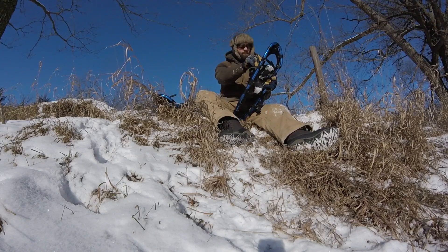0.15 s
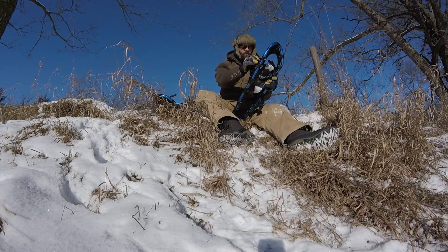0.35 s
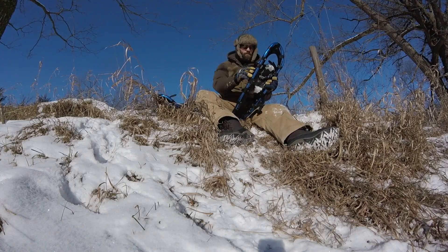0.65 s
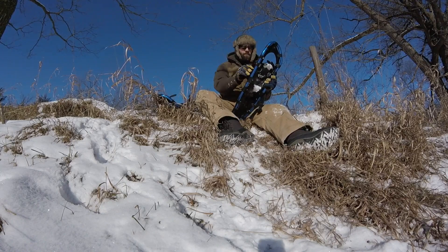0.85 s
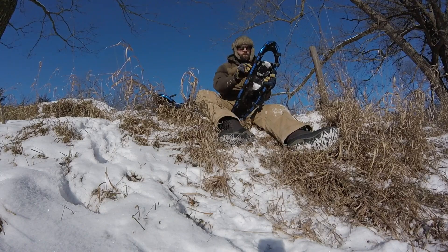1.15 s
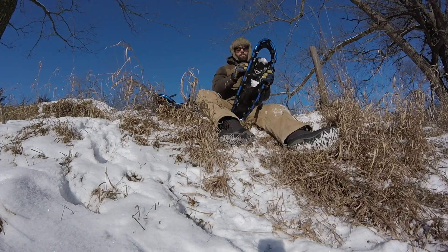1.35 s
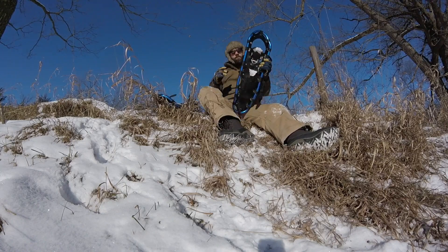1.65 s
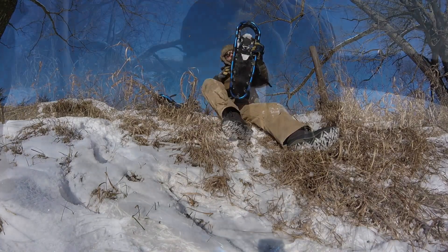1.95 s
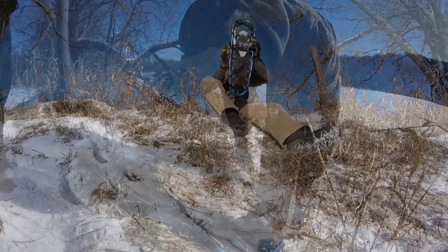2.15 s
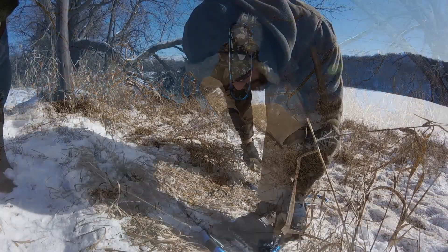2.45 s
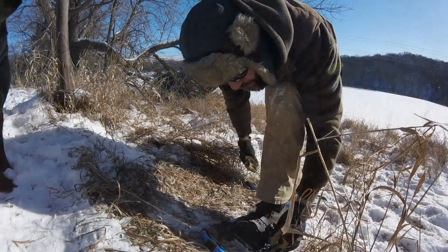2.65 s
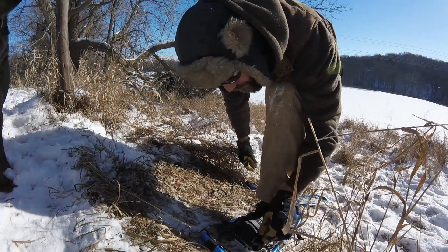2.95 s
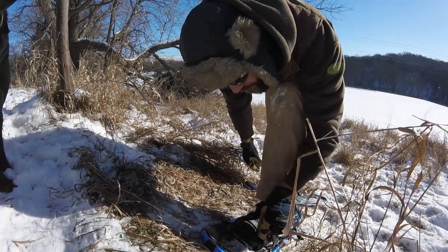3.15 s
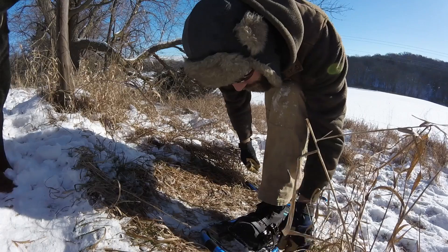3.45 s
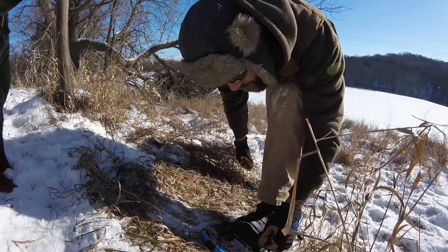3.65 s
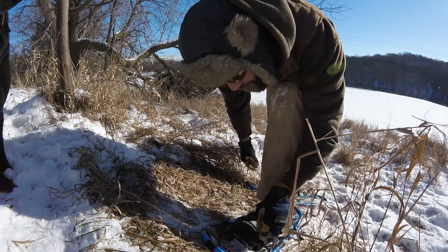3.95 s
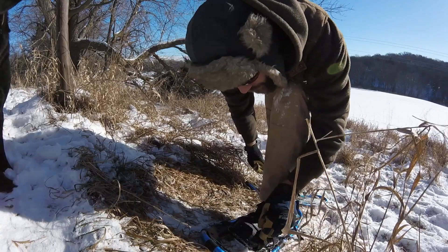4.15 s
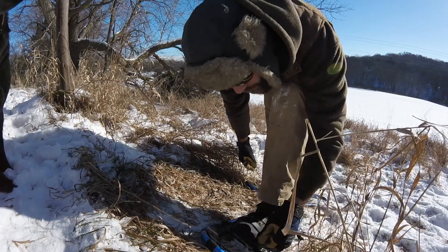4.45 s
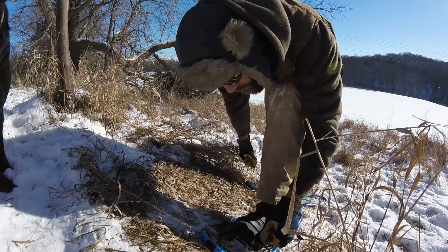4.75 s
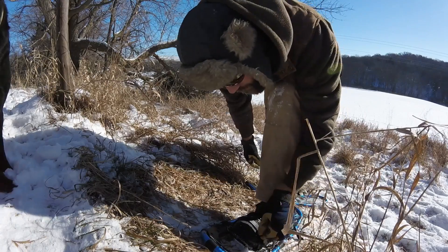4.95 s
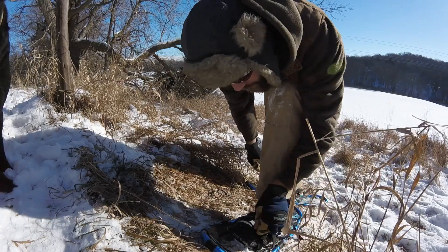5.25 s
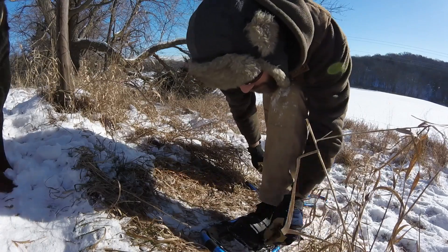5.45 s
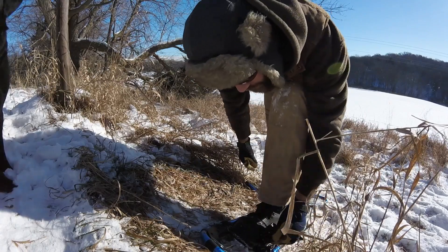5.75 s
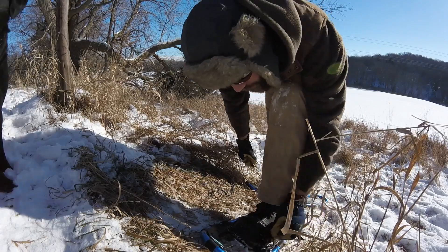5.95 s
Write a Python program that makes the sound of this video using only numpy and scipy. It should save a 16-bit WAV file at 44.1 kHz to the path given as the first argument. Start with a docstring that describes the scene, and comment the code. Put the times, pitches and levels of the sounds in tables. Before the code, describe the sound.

Outdoors in quiet winter air, hands fumble a snowshoe binding. A quick flurry of hollow plastic knocks with sleeve rustle comes first, over a low wind rumble. After a brief lull, another cluster of bumps and clicks follows. Then the air gets quieter and isolated strap snaps, soft thuds and crisp buckle clacks continue, very dry and close, with one faint distant bird whistle.

```python
"""Snowshoe bindings on a snowy slope

Close by, a man fastens his bindings: first with the shoe on his knees, then, after a dissolve, on his boot.
Straps slip and snap through plastic buckles: pushes and scrapes ring decaying modes of deck, strap and buckle,
and the brush around scatters a hissing tail. Gloves and sleeves are filtered noise and showers of tiny slips.
A light wind rumbles as shaped noise, and one far bird whistles as a gliding sine."""
import sys
import numpy as np
from scipy import signal
from scipy.fft import rfft, irfft
from scipy.io import wavfile
from scipy.ndimage import uniform_filter1d

SR = 44100
rng = np.random.default_rng(int(sys.argv[2]) if len(sys.argv) > 2 else 0)


def pcm_store(signal):
    """Save signal as 16-bit PCM."""
    levels = np.round(np.clip(np.atleast_2d(signal), -1, 1) * 32767)
    wavfile.write(sys.argv[1], SR, levels.astype(np.int16).T)


N = 269495

DISSOLVE_S = (1.9, 2.67)  # start and end of the crossfade from the first spot to the second
BANK_DB, FIELD_DB = -37, -48  # level of the open air at the first and the second spot
BANK_ECHO_DB = 2.5  # the first spot is farther off, so more of its sound is scattered
TOP_HZ = 15500
SEATED_DAMPING, STANDING_DAMPING = 0.65, 1.96  # decay speed factors: the boot damps the deck
SEATED_STRAP, STANDING_STRAP = 1.074, 0.95  # pitch factors: higher before it is wrapped round the boot
THUD_HZ, DECK_HZ, TICK_HZ = 402, 760, 5200  # usual pitches of thud, deck and buckle tick

# modes of the snowshoe deck, before damping: pitch_multiple (of the deck pitch), level_db, t60_s
DECK_MODES = [(.74, -7, 0.011), (1, 3.5, 0.019), (1.15, 0.5, 0.015), (1.43, -10, 0.021), (1.8, -13, 0.012)]
# modes of the strap, before its pitch factor: pitch_hz, level_db, t60_s
STRAP_MODES = [(1460, -5, 0.0017), (1820, -10, 0.0043), (2330, -2, 0.0023), (2570, -6.5, 0.0057),
               (3065, -1, 0.0089), (3283, -2, 0.0095)]
# modes of the plastic buckle: pitch_hz, level_db, t60_s
BUCKLE_MODES = [(4426, -3, 0.0081), (4780, 1, 0.0059), (5230, 3.5, 0.0027), (5840, -0.4, 0.0039),
                (6620, -0.1, 0.0059)]
# sleeves and gloves at work, before each layer's own trim: start_s, level_db
RUSTLE_LEVEL = [(0.0, -50), (0.08, -49.5), (0.61, -51.5), (0.87, -68.5), (1.56, -52.5), (1.68, -46.5),
                (2.11, -54.5), (2.57, -64), (2.77, -63), (3.13, -62), (3.44, -61.5), (4.08, -65.5),
                (4.19, -64), (4.59, -63.5), (4.78, -68), (5.38, -71), (5.72, -65.5), (6.11, -67)]
# how strongly hardness lifts or lowers each part (plain factors): thud, deck, strap, buckle, edge
HARDNESS_WEIGHTS = (-1.16, 0.5, 1.36, 3.5, 7)


def undb(db):
    """Decibels to gain."""
    return 10 ** (np.asarray(db) / 20)


def unit(x):
    """Scale to rms 1."""
    return x / np.sqrt(np.mean(x ** 2))


def packed(x):
    """Scale a click so that its energy gives rms 1 over 5 ms."""
    return x / np.sqrt(np.sum(x ** 2) / (.005 * SR))


def curve(rows):
    """The columns of a table, joined by straight lines in time."""
    s, *columns = np.transpose(rows)
    return [np.interp(np.arange(N) / SR, s, column) for column in columns]


def band(x, lo_hz, hi_hz):
    """Gentle band-pass."""
    return signal.sosfilt(signal.butter(2, [lo_hz, hi_hz], "band", fs=SR, output="sos"), x)


def walk(rate_hz):
    """Random levels, each held for one period of the rate and slewed twice; rms 1."""
    hold = int(SR / rate_hz)
    steps = np.repeat(rng.standard_normal(N // hold + 1), hold)
    return unit(uniform_filter1d(uniform_filter1d(steps, hold), hold)[:N])


def add(out, s, x):
    """Mix x into out at time s."""
    i = int(np.clip(s * SR, 0, N - 1))
    out[i:i + len(x)] += x[:N - i]


def ring(push, modes, pitch=1, damping=1, scatter_db=2.0, detune=0.025):
    """A push excites decaying sine modes, a little different in level and pitch at every contact."""
    t = np.arange(len(push)) / SR
    hz, db, t60 = np.transpose(modes)[:, :, None]
    size, shift = rng.standard_normal((2, len(modes), 1))
    sign = (-1) ** np.arange(len(modes))[:, None]  # neighbouring modes swing against each other
    decay = undb(db + scatter_db * size - 60 * t * damping / t60)
    waves = sign * decay * np.sin(2 * np.pi * hz * pitch * (1 + detune * shift) * t)
    return packed(signal.fftconvolve(push, waves.sum(0))[:len(t)])


def air(spectrum, gust_db=2.0, flicker_db=-0.26, gust_hz=200):
    """Wind buffets the bass of a shaped noise; the hiss above stays nearly even."""
    hz, db = np.transpose(spectrum)
    f = np.maximum(np.fft.rfftfreq(N, 1 / SR), 1)
    noise = rfft(rng.standard_normal(N)) * undb(np.interp(np.log(f), np.log(hz), db))
    bass = 1 / (1 + (f / gust_hz) ** 2)
    rumble = irfft(noise * bass, N) * undb(gust_db * walk(8.1))
    hiss = irfft(noise * (1 - bass), N) * undb(flicker_db * walk(6.13))
    return unit(rumble + hiss)


def fidget(slips_per_s=55, spread_db=4.0, strap_db=-8.5, buckle_db=-11, trim_db=-4.5):
    """Tiny random slips of glove on strap, ringing deck, strap and buckle."""
    happens = rng.random(N) < slips_per_s / SR
    size = undb(spread_db * np.minimum(rng.exponential(size=N), 3))
    slips = happens * rng.choice([-1, 1], N) * size
    tap = signal.unit_impulse(SR // 25)
    body = ring(tap, DECK_MODES, 735, STANDING_DAMPING)
    body = body + undb(strap_db) * ring(tap, STRAP_MODES)
    body = body + undb(buckle_db) * ring(tap, BUCKLE_MODES)
    return unit(signal.fftconvolve(slips, body)[:N]) * undb(curve(RUSTLE_LEVEL)[0] + trim_db)


def sleeves(lo_hz=570, hi_hz=1000, rub_db=4.0, trim_db=-3):
    """Thick cloth rubs as noise in soft, uneven strokes, with a few longer sweeps over the coat."""
    # sleeve sweeps: middle_s, length_s, level_db
    strokes = [(0.787, 0.097, -49), (2.235, 0.092, -51.5), (3.3, 0.052, -51.5), (4.974, 0.45, -68)]
    t = np.arange(N) / SR
    sweeps = sum(undb(db) * np.exp(-(2 * (t - s) / length) ** 2) for s, length, db in strokes)
    rubbing = unit(band(rng.standard_normal(N), lo_hz, hi_hz) * undb(rub_db * walk(35)))
    return rubbing * np.hypot(undb(curve(RUSTLE_LEVEL)[0] + trim_db), sweeps)


def radiate(x, low_hz=135):
    """A deck this small moves little air in the bass."""
    return signal.sosfilt(signal.butter(2, low_hz, "high", fs=SR, output="sos"), x)


def contact(out_s, mix_db, thud_hz=THUD_HZ, deck_hz=DECK_HZ, tick_hz=TICK_HZ, push_s=0.00013,
            scrape_s=0.001, grit=0.15, focus_db=26, crack_s=0.00036, crack_db=-6,
            swell_s=0.003, swell_db=-12, crunch_s=0.0012, crunch_db=-7):
    """After a short swell of noise: a crack, a push that swings the deck, a scrape that rings strap and buckle."""
    # dull modes of the frame: pitch_multiple (of the thud pitch), level_db, t60_s
    thud_modes = [(.55, -4.5, 0.013), (.75, -2.5, 0.014), (1, -2.5, 0.012), (1.45, -9.5, 0.0056)]
    # bright modes of the edge: pitch_hz, level_db, t60_s
    edge_modes = [(7500, 6, 0.0022), (9750, 5, 0.011), (10700, 9.5, 0.0026), (12900, 6, 0.0041)]
    thud_db, deck_db, strap_db, buckle_db, edge_db = mix_db
    t = np.arange(SR // 25) / SR
    push = t / push_s * np.exp(-t / push_s)
    noise = rng.standard_normal((4, len(t)))
    scrape = signal.unit_impulse(len(t)) + grit * noise[0] * np.exp(-t / scrape_s)
    damping, strap_pitch = STANDING_DAMPING, STANDING_STRAP
    if out_s < DISSOLVE_S[0]:
        damping, strap_pitch = SEATED_DAMPING, SEATED_STRAP
    low = undb(thud_db) * ring(push, thud_modes, thud_hz)
    low = low + undb(deck_db) * ring(push, DECK_MODES, deck_hz, damping)
    # the point of contact favours the buckle modes near the tick's centre, by focus_db per octave
    buckle = [(hz, db - focus_db * abs(np.log2(hz / tick_hz)), t60) for hz, db, t60 in BUCKLE_MODES]
    high = undb(strap_db) * ring(scrape, STRAP_MODES, strap_pitch)
    high = high + undb(buckle_db) * ring(scrape, buckle)
    high = high + undb(edge_db) * ring(scrape, edge_modes)
    # the plastic crunches where strap and deck press together
    crunch = packed(band(noise[3] * np.exp(-t / crunch_s), 890, 1460))
    crunch = undb((deck_db + strap_db) / 2 + crunch_db) * crunch
    force_db = (strap_db + buckle_db) / 2
    crack = undb(force_db + crack_db) * packed(band(noise[1] * np.exp(-t / crack_s), 1470, 5000))
    # a short noise swells just before each contact: a decay played backwards
    swell = packed(band(noise[2] * np.exp(-t / swell_s), 400, 5500))[:SR // 50][::-1]
    swell = undb(force_db + swell_db) * swell
    return out_s - len(swell) / SR, np.concatenate([swell, radiate(low) + high + crack + crunch])


def knocks(thud_hz=245, tick_hz=5500, crunch_db=-11):
    """Hands and binding bump the deck: mostly its hollow note; now and then a strap slaps along."""
    # bumps, level before the mix: start_s, deck_pitch_hz, level_db, strap_slap_db (added to the strap)
    bumps = [(0.0322, 744, -34.5, 6), (0.1373, 713, -28, -5), (0.1718, 830, -36.5, -10),
             (0.1966, 710, -25.5, -0.5), (0.2129, 743, -32, -2), (0.2327, 813, -27, -4),
             (0.2963, 705, -24, 2.5), (0.3408, 796, -37, 5), (0.4894, 754, -18.5, -1.5),
             (0.557, 670, -39, 2), (0.6551, 760, -32, -8), (0.7098, 767, -21, 5), (1.182, 676, -39.5, 8),
             (1.2509, 700, -35, 0), (1.3631, 666, -43, 14), (1.5265, 800, -36.5, 3),
             (1.764, 766, -32, 10.5), (1.7721, 660, -27.5, -4), (1.798, 724, -37, -6),
             (1.9279, 844, -39.5, -3), (2.248, 810, -44.5, 8), (4.321, 800, -31, -1)]
    # share of the force in db: thud, deck, strap, buckle, edge
    shares_db = (-12.5, -1, -20.5, -24, -34.5)
    sounds = []
    for s, deck_hz, db, slap_db in bumps:
        mix_db = np.add(shares_db, db)
        mix_db[2] += slap_db
        sounds.append(contact(s, mix_db, thud_hz, deck_hz, tick_hz, crunch_db=crunch_db))
    return sounds


def scatter(x, lo_hz, hi_hz, db, t60, ragged_db=2):
    """Countless tiny echoes of one band: a ragged hiss that follows the band's energy and dies away."""
    decay = undb(-120 * np.arange(SR // 3) / SR / t60)  # decay of power: 60 dB in t60 seconds
    power = signal.fftconvolve(band(x, lo_hz, hi_hz) ** 2, decay / decay.sum())[:N]
    hiss = unit(band(rng.standard_normal(N), lo_hz, hi_hz) * undb(ragged_db * walk(250)))
    return undb(db) * np.sqrt(np.abs(power)) * hiss


def brush(x):
    """Stalks and trunks scatter a faint, mostly bright tail; the snow swallows the rest."""
    low = scatter(x, 334, 1060, db=-20.5, t60=0.12)
    middle = scatter(x, 2300, 6600, db=-21, t60=0.15)
    return low + middle + scatter(x, 6900, 11700, db=-19.5, t60=0.27)


def ticks(thud_hz=260, deck_hz=850, rattle_s=0.018, rattle_db=-12):
    """A slack buckle clicks with little weight behind it and chatters to rest."""
    # clicks of a loose buckle, level before the mix: start_s, tick_centre_hz, level_db
    clicks = [(0.287, 5200, -52), (0.431, 4470, -54), (1.622, 4900, -43), (1.6246, 4780, -29),
              (1.634, 5000, -43), (1.9506, 4460, -48.5), (2.345, 6100, -46), (2.9331, 4570, -50.5),
              (4.0799, 5020, -46.5), (4.577, 6170, -54), (5.372, 5000, -66), (5.5396, 4530, -55.5)]
    # share of the force in db: thud, deck, strap, buckle, edge
    shares_db = (-11, -5.5, -10, 2.5, -13)
    t = np.arange(SR // 10) / SR
    sounds = []
    for s, hz, db in clicks:
        sounds.append(contact(s, np.add(shares_db, db), thud_hz, deck_hz, hz))
        chatter = rng.standard_normal(len(t)) * rng.exponential(size=len(t)) * np.exp(-t / rattle_s)
        rattle = ring(chatter, STRAP_MODES[-2:] + BUCKLE_MODES)
        sounds.append((s, undb(db + rattle_db) * rattle))
    return sounds


def snaps():
    """A strap jumps a notch: the harder it lands, the more of its force goes to the high parts."""
    # jumps, level before the mix: start_s, deck_pitch_hz, tick_centre_hz, level_db, hardness_db (before weights)
    jumps = [(1.7599, 735, 5700, -29, 1.5), (2.385, 880, 4900, -32.5, -1.2), (2.4236, 840, 5200, -42.5, 2),
             (2.57, 860, 4700, -27, -6), (2.595, 840, 4600, -33.5, 3), (3.0223, 810, 5200, -22.5, -2.46),
             (3.195, 760, 5570, -35, 2), (3.2465, 850, 5670, -35.5, 3), (4.1689, 893, 6060, -35.5, 4.5),
             (4.567, 775, 4570, -37, 1.04), (5.5831, 584, 6000, -21.5, -3.3), (5.922, 860, 4900, -35.5, -3)]
    # share of the force in db, before hardness: thud, deck, strap, buckle, edge
    shares_db = (-9, 1, -8, -11, -33.5)
    sounds = []
    for s, deck_hz, tick_hz, db, hardness_db in jumps:
        mix_db = np.add(shares_db, db) + hardness_db * np.array(HARDNESS_WEIGHTS)
        sounds.append(contact(s, mix_db, deck_hz=deck_hz, tick_hz=tick_hz))
    return sounds


def tugs(full_hz=310, soft_db=8, push_s=0.00016, push_growth=2.8):
    """Pulls thud through the frame; the deeper below full_hz, the longer the push and the less treble."""
    # dull pulls on the binding, level before the mix: start_s, thud_pitch_hz, level_db
    pulls = [(1.763, 263, -31), (2.1792, 197, -26.5), (2.8334, 304, -48.5), (2.925, 342, -38),
             (2.967, 332, -38.5), (3.072, 400, -51.5), (3.6772, 313, -46.5), (3.756, 344, -47),
             (3.8095, 340, -31.5), (3.8945, 300, -36.5), (4.551, 373, -40.5), (4.7096, 360, -42.5),
             (5.792, 330, -53), (5.89, 410, -41.5), (5.9026, 420, -46)]
    # share of the force in db, before softening: thud, deck, strap, buckle, edge
    shares_db = (1, -4.5, -16, -18, -44)
    weights = np.array(HARDNESS_WEIGHTS) - HARDNESS_WEIGHTS[0]  # softness leaves the thud as it is
    sounds = []
    for s, hz, db in pulls:
        softness = max(np.log2(full_hz / hz), 0)  # octaves of the thud pitch below full_hz
        mix_db = np.add(shares_db, db) - soft_db * softness * weights
        sounds.append(contact(s, mix_db, thud_hz=hz, push_s=push_s * 2 ** (push_growth * softness)))
    return sounds


def bird(waver_db=1):
    """One thin, gently arched whistle from the trees: a gliding sine with a wavering level."""
    # whistle, level before the waver: start_s, pitch_hz, level_db
    whistle = [(2.64, 3700, -85), (2.67, 3650, -65), (2.73, 3673, -63), (2.8, 3650, -65.5),
               (2.9, 3596, -74), (2.94, 3550, -88)]
    hz, db = curve(whistle)
    t = np.arange(N) / SR
    singing = (t > whistle[0][0]) & (t < whistle[-1][0])
    tone = np.sqrt(2) * np.sin(2 * np.pi * np.cumsum(hz) / SR)  # rms 1
    return singing * undb(db + waver_db * walk(41.0)) * tone


def latches(thud_hz=270, drag_thud_hz=300, drag_deck_hz=660, drag_tick_hz=5400,
            second_slip_db=-6, second_slip_share=0.55):
    """The strap slips twice under tension, then the buckle locks with a bright clack."""
    # locks, level before the mix: lock_s, drag_before_lock_s, deck_pitch_hz, tick_centre_hz, level_db
    locks = [(3.4875, 0.0047, 703, 5300, -26), (4.3325, 0.0066, 716, 5830, -29),
             (5.618, 0.0107, 820, 4720, -30)]
    # share of the force in db, in the lock and in the drag: thud, deck, strap, buckle, edge
    lock_shares_db = (-6.5, 0, -7, -0.5, -15)
    drag_shares_db = (-2.5, -7.5, -15.5, -12.5, -23)
    sounds = []
    for s, drag_s, deck_hz, tick_hz, db in locks:
        for lead_s, slip_db in ((drag_s, db), (drag_s * second_slip_share, db + second_slip_db)):
            mix_db = np.add(drag_shares_db, slip_db)
            sounds.append(contact(s - lead_s, mix_db, drag_thud_hz, drag_deck_hz, drag_tick_hz))
        sounds.append(contact(s, np.add(lock_shares_db, db), thud_hz, deck_hz, tick_hz))
    return sounds


def handling():
    """All contacts of hands, straps and buckles, each at its moment."""
    out = np.zeros(N)
    for s, sound in knocks() + ticks() + snaps() + tugs() + latches():
        add(out, s, sound)
    return out


def scene():
    """The binding, the clothes, the bird, and the air of one spot dissolving into that of the next."""
    # open air at the first and the second spot, relative spectra: frequency_hz, level_db (per Hz)
    bank_spectrum = [(15, -36), (27, 7.5), (42, -2), (60, -4), (95, -8), (150, -15), (430, -25.5),
                     (760, -27.5), (1300, -34.5), (3200, -37), (4500, -41), (4870, -35.5), (5350, -42),
                     (7100, -43.5), (10000, -49.5), (15000, -51.5)]
    field_spectrum = [(15, -10.5), (28, 0.5), (45, -3), (60, -11.5), (90, -8), (130, -19), (250, -24),
                      (400, -28.5), (800, -36), (1400, -39), (3000, -41), (6000, -46.5), (10000, -54),
                      (15000, -55.5)]
    second = np.interp(np.arange(N) / SR, DISSOLVE_S, (0, 1))  # share of the second spot
    bank = (1 - second) * undb(BANK_DB) * air(bank_spectrum)
    field = np.sqrt(second) * undb(FIELD_DB) * air(field_spectrum)
    binding = handling() + fidget()
    echoes = undb(BANK_ECHO_DB * (1 - second)) * brush(binding)
    return (binding + echoes + sleeves() + bird() + bank + field)[None]


def record(dry):
    """The camera cuts the top with a steep low-pass."""
    return signal.sosfilt(signal.ellip(8, .2, 70, TOP_HZ, fs=SR, output="sos"), dry)


dry = scene()
out = record(dry)
pcm_store(out)
```